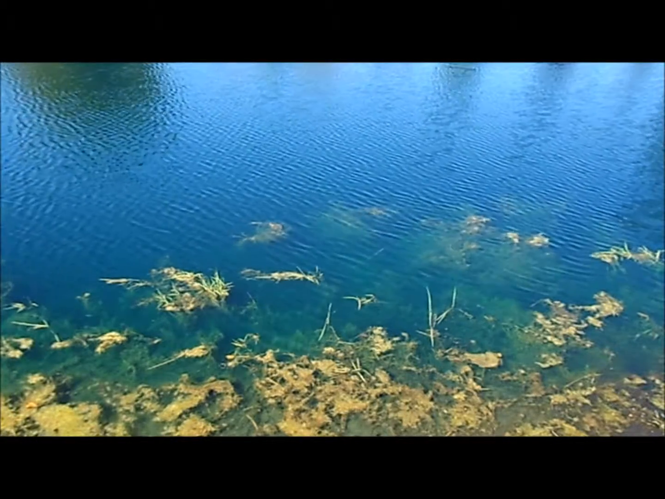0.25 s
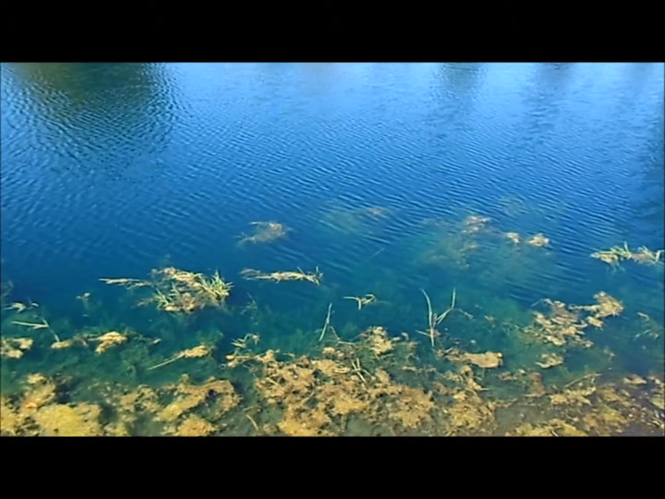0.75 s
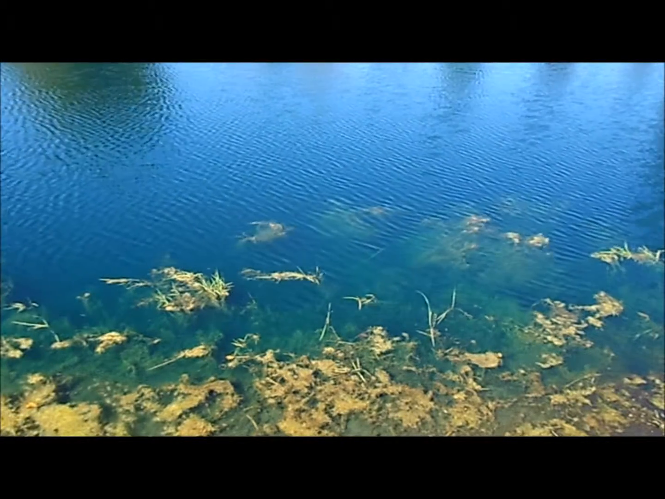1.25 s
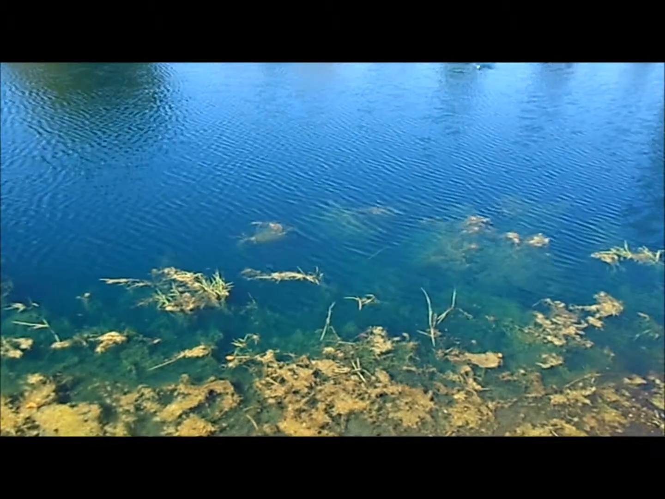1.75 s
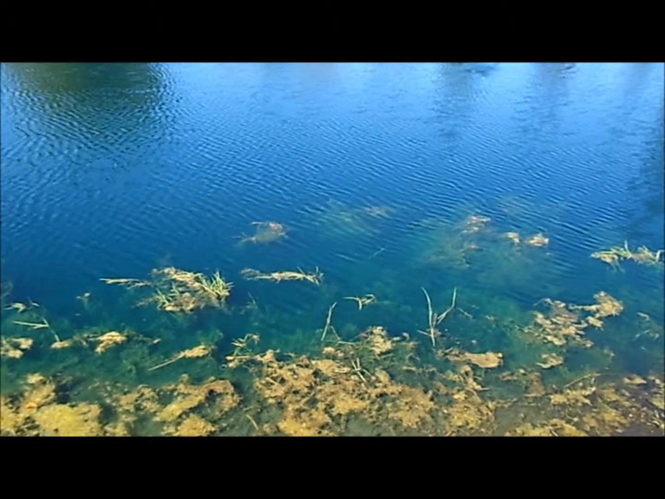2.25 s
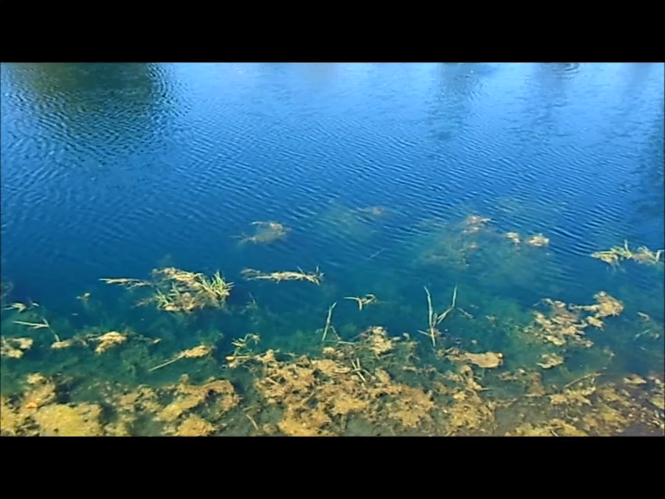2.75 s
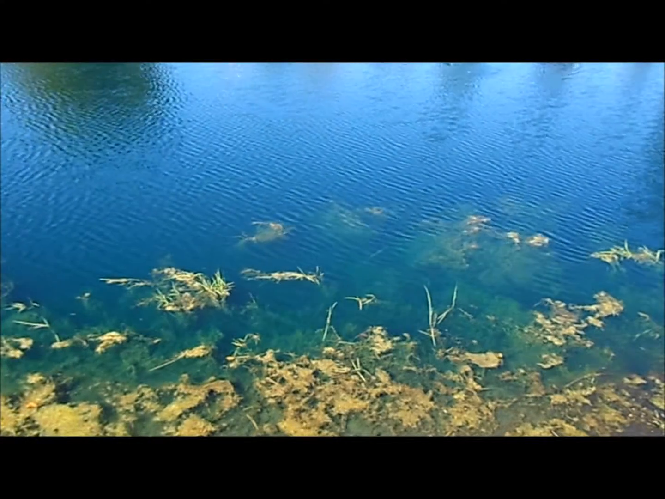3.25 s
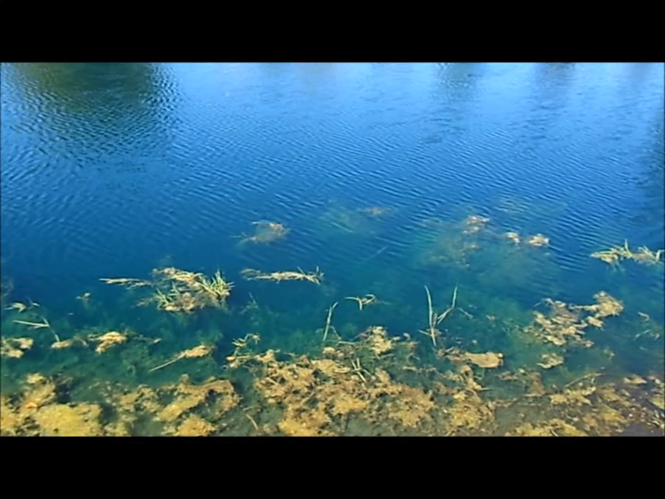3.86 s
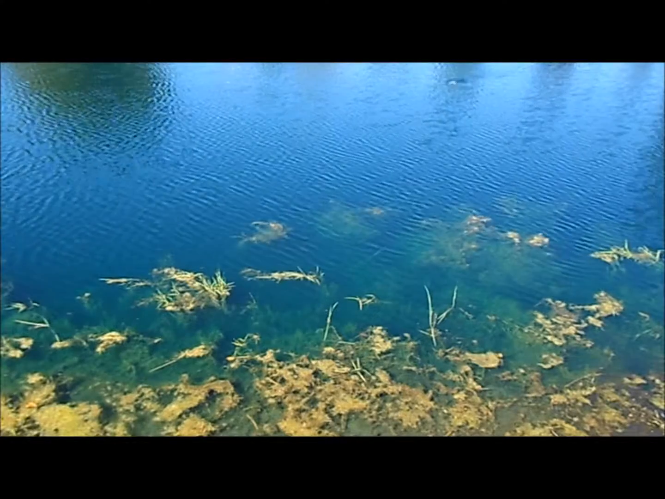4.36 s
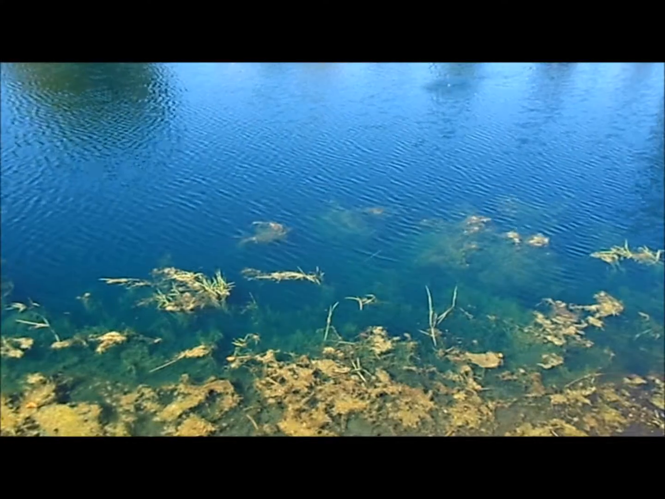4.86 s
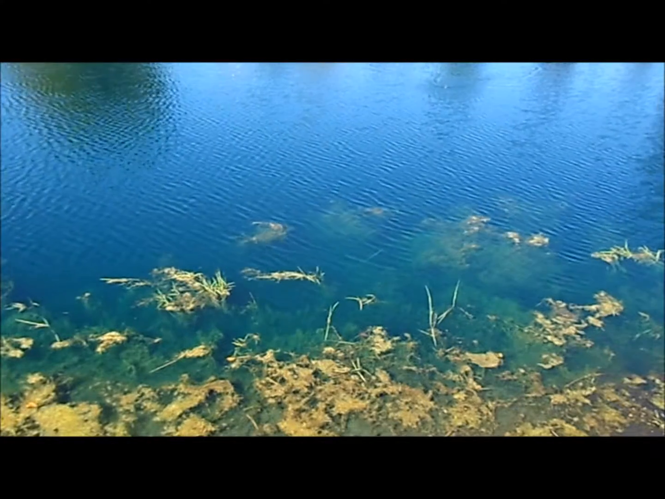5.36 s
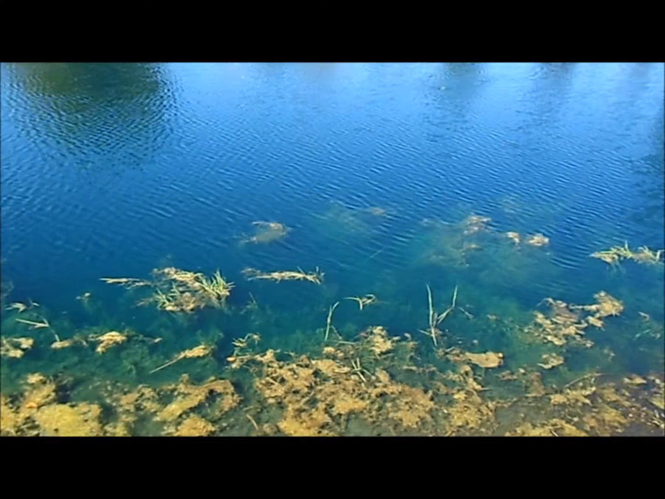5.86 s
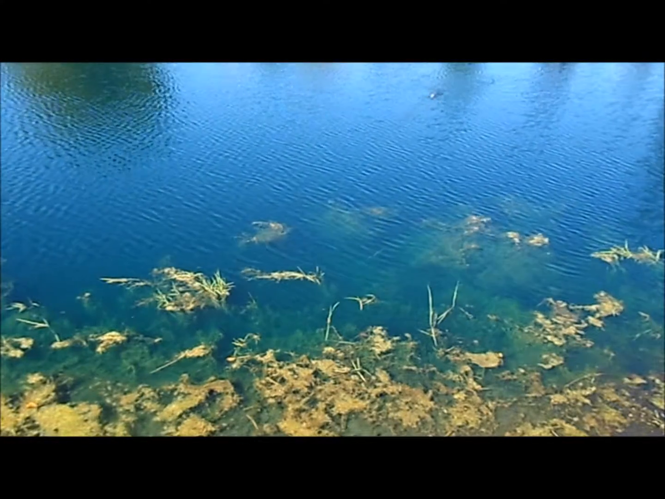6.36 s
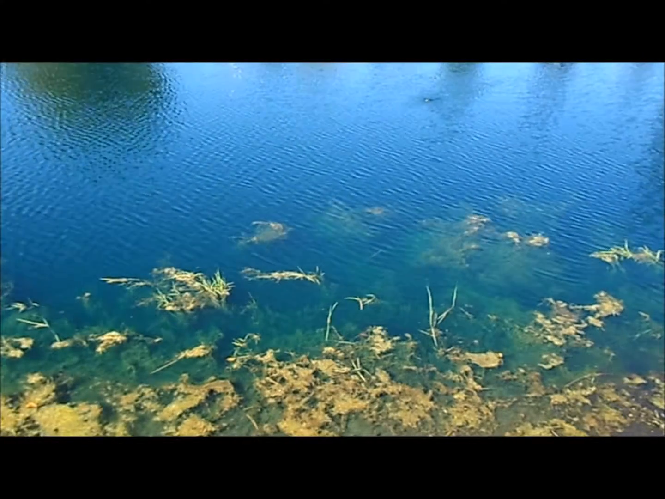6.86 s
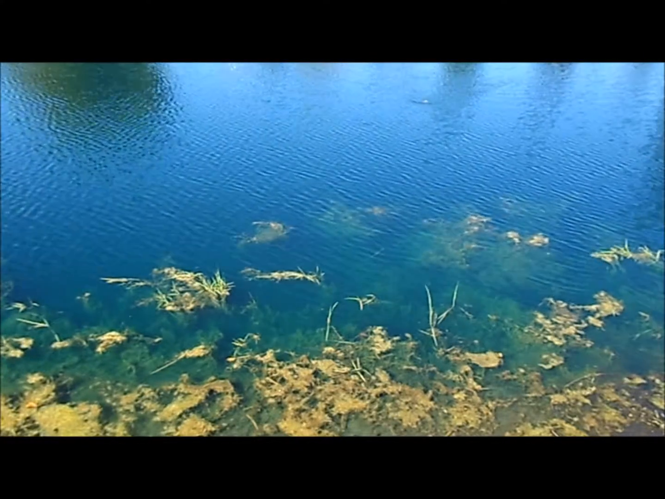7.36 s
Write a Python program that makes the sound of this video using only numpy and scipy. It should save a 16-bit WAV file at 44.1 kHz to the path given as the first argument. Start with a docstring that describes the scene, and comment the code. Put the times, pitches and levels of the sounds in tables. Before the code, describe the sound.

A fishing reel is handled close to a mono microphone at a pond, in open air without echo. From 0 to 0.7 s a hand rubs the body in a coarse, mid-toned scrape while the handle knocks rapidly, short and hollow. The loudest knock lands at 0.83 s, with a small rattle and brief rubs; more knocks come at 1.2-1.4 s. A high metallic tick sounds at 1.72 s. Around 2.0-2.2 s, chirpy line squeaks run into sharp bail clicks and fine ticks. Thin squeaks appear near 2.9-3.05 and 3.5 s, a knock at 3.75 s, and bright clicks at 4.2-4.6 s. Throughout, gusty low wind buffets and rumbles under soft rustle, airy hiss and a very faint thin whine. From 4.5 s the background falls to near quiet, leaving faint ticks around 6.2-6.6 s, a small squeak at 6.9 s, a slight wind swell around 7.1 s, and last tiny ticks at 7.6 s.

```python
"""A fishing reel is wound by a pond: a hand rubs it, its handle knocks, gear and bail tick, its line squeaks.
Friction is crackling noise coloured by the body; each knock excites damped body modes.
The line's stick-slip in the roller gives gliding tones; gear and bail contacts give short damped partials.
Wind on a mono microphone is low shaped noise with gusts, over rustling, an airy hiss and two thin whines.
The loudness of the whole background sinks, with a small swell near the end."""
import sys
import numpy as np
from scipy import signal
from scipy.fft import rfft, irfft
from scipy.io import wavfile
from scipy.ndimage import uniform_filter1d

SR = 44100
rng = np.random.default_rng(int(sys.argv[2]) if len(sys.argv) > 2 else 0)


def output_pcm(signal):
    """Save a mono or channel-first signal as 16-bit PCM at the path in sys.argv[1].

    Samples are clipped to [-1, 1] before scaling.
    """
    pcm = np.clip(np.atleast_2d(signal).T, -1, 1) * 32767
    wavfile.write(sys.argv[1], SR, np.round(pcm).astype(np.int16))


N = 336042
T = np.arange(N) / SR  # time in s

# strokes of a hand along the reel body: [t/s, attack/s, hold/s, release/s (time to fall 30 dB), level/dB]
RUB_STROKES = [(0, 0.14, 0.26, .45, -30), (0.827, .02, 0.055, .12, -36), (1.182, .03, .04, .1, -39),
               (1.31, .03, 0.04, .15, -48)]
# spectrum of the rubbing as the body colours it: [f/Hz, relative density/dB]
RUB_SPECTRUM = [(250, -19), (450, 0.5), (630, 0), (900, 2), (1050, -6), (1280, 1.5), (1600, -6),
                (2300, -14), (3000, -41)]
# overall loudness curve of the background, shared by hiss, rustle and wind: [t/s, level/dB]
BACKGROUND_LEVEL = [(0, -31.5), (.8, -32), (1.2, -31.5), (1.38, -30), (1.57, -33.5), (1.8, -33),
                    (2.25, -32.5), (2.52, -36.5), (2.74, -36.5), (3.05, -34), (4.39, -33.5), (4.55, -33.5),
                    (4.79, -38), (5.47, -45), (6.07, -46.5), (6.54, -46.5), (6.68, -44), (7.05, -41.5),
                    (7.62, -44.5)]
# spectrum of the slow buffeting: [f/Hz, relative density/dB]
BUFFET_SPECTRUM = [(6, -39), (12, -2), (25, -5), (45, -6.5), (70, -24), (120, -72)]
# spectrum of the higher wind rumble: [f/Hz, relative density/dB]
RUMBLE_SPECTRUM = [(30, -38), (50, -1.5), (85, 1.5), (120, -3.5), (145, -10), (178, -7), (210, -16.5),
                   (330, -17), (450, -36)]
# gusts and lulls on the microphone: [t/s, buffeting change/dB, rumble change/dB]
WIND_GUSTS = [(.33, -7, 6.5), (.57, 9, 4), (0.741, 7, -2), (.85, 3.5, 2.5), (1.04, 7, 0), (1.29, 5.5, -3.5),
              (1.62, 5.5, -4), (1.72, -9, -3.5), (1.96, -17, 6), (2.28, -13, 2.5), (2.46, 7.5, 2),
              (2.62, 5, -2), (2.76, 10, 0.5), (2.91, 9.5, 7), (3.14, 4.5, 2.5), (3.58, 3, 3), (3.71, 6, -2),
              (3.99, 6.5, -3), (4.11, 15.5, 0.5), (4.23, 6, 0.5), (4.38, -2, -2), (4.61, -9, 0.5),
              (4.92, 9, 1), (5.22, 3, -3), (6.66, 2, 2), (7.14, 12, 1.5)]
# spectrum of the rustling: [f/Hz, relative density/dB]
RUSTLE_SPECTRUM = [(120, -13), (200, 0.5), (291, -5), (463, -2.5), (561, -4), (1020, -5.5), (1340, -5),
                   (1970, -9), (3000, -14.5), (3900, -44), (6600, -120)]
# broad spectrum of the hiss: [f/Hz, relative density/dB]
HISS_SPECTRUM = [(1500, -28), (2300, -12.5), (2700, -8), (3600, -1.5), (4400, -4), (5600, -7), (6500, -9.5),
                 (8200, -8.5), (9500, -19.5), (10400, -7), (12000, -1)]
# resonant bumps on the hiss: [f/Hz, width/Hz, gain of the bump/dB]
HISS_BUMPS = [(3370, 140, -12.5), (4330, 110, -13), (6780, 240, -3.5), (8100, 150, -16), (9100, 250, 1)]
# thin, almost steady tones: [f/Hz, amplitude relative to the hiss/dB]
WHINE_TONES = [(7837, -17), (7897, -22.5)]
# knocks of handle and body: [t/s, peak level/dB, f driven by the contact/Hz, spread/octaves]
HANDLE_KNOCKS = [(0.165, -17, 1260, .3), (.177, -14, 560, 0.43), (0.2097, -12, 1320, 0.42),
                 (0.2367, -14.5, 1570, 0.26), (0.2683, -13.5, 1330, 0.34), (0.3812, -13, 1370, 0.23),
                 (.426, -18, 869, 0.57), (.516, -20, 514, 0.49), (0.696, -13, 1670, .3),
                 (0.826, -4, 1180, .7), (.8444, -15, 1350, .34), (.862, -19, 1500, .3),
                 (.867, -20, 1300, .12), (.873, -18.5, 1340, .12), (.881, -22, 1290, 0.091),
                 (.9043, -18, 1620, .3), (.948, -20, 1280, 0.089), (1.2046, -18.5, 2290, 0.29),
                 (1.229, -20, 649, .37), (1.3254, -16, 1280, 0.42), (1.3641, -15, 1440, 0.35),
                 (1.379, -15, 1870, .32), (1.3928, -21.5, 1320, .23), (1.788, -24.5, 1750, .08),
                 (1.8046, -19.5, 1400, 0.42), (2.103, -15.5, 1360, 0.052), (2.2187, -15.5, 1440, 0.092),
                 (2.6922, -27, 1480, 0.25), (3.632, -21.5, 1460, 0.28), (3.7453, -14, 1310, 0.32),
                 (4.2503, -25, 1490, .3), (4.2944, -26, 1590, .27), (4.449, -24, 516, 0.28),
                 (6.559, -40, 735, .05)]
# modes of the reel body: [f/Hz, relative level/dB, t60/s]
BODY_MODES = [(493, 0, 0.044), (652, 1, .05), (750, -26, 0.1), (897, 1, 0.061), (1306, -2, 0.058),
              (1390, 2.5, 0.042), (1520, -1, 0.023), (1760, 8, 0.021), (2070, 5, 0.035), (2350, 5, 0.037)]
# squeaks of the line, one row for each slip: [t/s, length/s, first f/Hz, last f/Hz, level before flutter/dB]
LINE_SLIPS = [(.17, .085, 10250, 9900, -47), (1.99, 0.015, 3150, 3400, -28.5),
              (2.0, 0.017, 3540, 3600, -27), (2.013, .012, 3400, 3320, -27),
              (2.022, 0.017, 3850, 3890, -29), (2.041, 0.0067, 5040, 4800, -26),
              (2.048, .007, 4650, 4600, -23), (2.061, 0.013, 4570, 4400, -26),
              (2.077, .012, 4450, 4400, -21), (2.088, .017, 4420, 4430, -20),
              (2.868, .016, 7520, 7400, -36), (2.89, .014, 7700, 7850, -37), (2.909, .014, 7620, 7620, -36),
              (3.021, .012, 3800, 3800, -31), (3.04, .018, 3300, 3330, -35), (3.054, .018, 3740, 3380, -29),
              (3.07, 0.014, 3100, 3150, -32.5), (3.471, .011, 3180, 3060, -30),
              (3.482, 0.01, 3140, 3100, -31), (3.493, .012, 2930, 2770, -31),
              (3.498, 0.026, 2370, 2040, -34), (3.519, 0.022, 2250, 2100, -32),
              (3.536, .012, 2250, 2500, -39), (4.197, .006, 2620, 2600, -33),
              (4.205, 0.013, 2740, 2680, -34), (6.878, .023, 4530, 4580, -32.5),
              (6.9, .018, 4400, 4670, -35), (6.915, 0.016, 4620, 4650, -37),
              (7.588, 0.034, 3230, 3000, -45)]
# ticks of the gear: [t/s, peak level/dB, centre f/Hz]
GEAR_TICKS = [(1.723, -11, 9400), (1.8574, -20, 9600), (1.8801, -23, 5970), (2.0368, -18, 8100),
              (2.0595, -20, 5000), (2.1114, -26, 9140), (2.1335, -22, 9800), (2.142, -28, 6900),
              (2.15, -16, 4500), (2.1674, -31, 8350), (2.2523, -23, 3640), (2.692, -30, 3130),
              (3.0744, -26, 6400), (4.1884, -16, 6560), (4.1934, -21, 5910), (4.3854, -22.5, 6860),
              (4.5027, -22, 8700), (4.5805, -21, 4900), (4.5894, -19.5, 8150), (4.6099, -25, 4960),
              (4.636, -27, 6500), (6.2023, -34, 8310), (6.2915, -34, 3760), (6.56, -31.5, 3100),
              (7.5827, -30, 6060), (7.5994, -33, 5500)]
# sharp clicks of the bail: [t/s, level/dB, tilt/(dB per octave)]
BAIL_SNAPS = [(2.1016, -11.5, -1.5), (2.156, -17, 1), (2.199, -18.5, 5), (2.2184, -10, -2.5),
              (4.18, -25.5, 16.5), (4.555, -23, 3)]
# parts of the bail that a snap rings: [f/Hz, relative level/dB, t60/s]
BAIL_MODES = [(2960, -6.5, 0.01), (4670, 0.5, 0.0099), (6620, -4, 0.018), (8330, -14.5, 0.0058),
              (10100, -2.5, 0.0054)]

RUSTLE_DB, RUMBLE_DB, BUFFET_DB = -4, 0, -0.5  # relative to the background level
RUSTLE_START_DB, RUSTLE_SETTLE_S = 5.5, 0.9  # initial excess of the rustle and its time constant
CALM_S, CALM_OVER_S, CALM_DB = 4.48, 0.5, -8  # start, duration and size of the drop as the wind eases
GUST_S = 0.051  # time from a gust's centre to 1/e of its dB change
SLIP_SWELL = 0.67  # exponent of the half-sine envelope of a slip
TICK_T60_S, TICK_REF_HZ, TICK_DAMPING = 0.012, 4600, 1  # t60 at the reference; it falls as f ** -damping
TOP_HZ = 11450  # stopband edge of the recorder


def undb(db):
    """A level in dB is 20 times the decimal logarithm of an amplitude ratio."""
    return 10 ** (np.asarray(db) / 20)


def unit(x):
    """Division by the root mean square gives a signal of unit rms."""
    return x / np.sqrt(np.mean(x ** 2))


def colour(x, points, peaks=()):
    """Linear filtering multiplies a spectrum by a gain curve and resonant bumps; the result has unit rms."""
    hz = np.maximum(np.arange(N // 2 + 1) * SR / N, 1)
    point_hz, point_db = np.transpose(points)
    gain = undb(np.interp(np.log(hz), np.log(point_hz), point_db, left=-90, right=-90))
    bumps = 1 + sum(undb(db) / (1 + (2 * (hz - centre) / width) ** 2) for centre, width, db in peaks)
    return unit(irfft(rfft(x) * gain * bumps, N))


def walk(rate, count=N):
    """Slow random modulation: normal values held for 1 / rate s, smoothed by two moving averages."""
    hold = int(SR / rate)
    held = np.repeat(rng.standard_normal(count // hold + 1), hold)
    smooth = uniform_filter1d(uniform_filter1d(held, hold), hold)
    return 1.3 * smooth[:count]  # restores much of the spread lost in averaging


def crackle(per_s, scatter_db):
    """Granular noise: sparse random impulses of uneven size briefly raise the amplitude of white noise."""
    grains = (rng.random(N) < per_s / SR) * undb(scatter_db * rng.exponential(size=N))
    decay = np.exp(-T[:200] / 0.00084)  # time constant in s
    return rng.standard_normal(N) * (1 + np.convolve(grains, decay)[:N])


def add(out, s, x):
    """Superposition: a sound starting at s seconds sums with those already present."""
    i = int(s * SR)
    out[i:i + len(x)] += x[:N - i]


def follow(rows):
    """Linear interpolation gives each column of a curve table at every sample."""
    s, *columns = np.transpose(rows)
    return [np.interp(T, s, column) for column in columns]


def rub():
    """Sliding friction: dense slips of skin and cloth, coloured by the body, rise, hold and decay per stroke."""
    strokes = np.zeros(N)
    for s, attack, hold, release, db in RUB_STROKES:
        rise = np.clip((T - s) / attack, 0, 1)
        since_hold = np.maximum(T - s - attack - hold, 0)
        strokes += undb(db) * rise * 1000 ** (-since_hold / (2 * release))
    return colour(crackle(250, 3.9), RUB_SPECTRUM) * strokes


def wind():
    """Wind noise at a microphone: slow buffeting and a higher rumble, which gusts lift or lull."""
    background_db, = follow(BACKGROUND_LEVEL)
    s, *lift_db = np.transpose(WIND_GUSTS)
    gusts = np.exp(-((T[None] - s[:, None]) / GUST_S) ** 2)
    buffet_db, rumble_db = background_db + lift_db @ gusts
    buffet_db = buffet_db + BUFFET_DB + CALM_DB * np.clip((T - CALM_S) / CALM_OVER_S, 0, 1)
    rumble_db = rumble_db + RUMBLE_DB + 0.92 * walk(8)
    buffet = colour(rng.standard_normal(N), BUFFET_SPECTRUM) * undb(buffet_db)
    rumble = colour(rng.standard_normal(N), RUMBLE_SPECTRUM) * undb(rumble_db)
    return buffet + rumble


def air():
    """Broadband noise with slow amplitude modulation: rustle and hiss, with whines, share the background level."""
    hiss_db, = follow(BACKGROUND_LEVEL)
    rustle_db = hiss_db + RUSTLE_DB + RUSTLE_START_DB * np.exp(-T / RUSTLE_SETTLE_S)
    rustle = colour(crackle(40, 2.0), RUSTLE_SPECTRUM) * undb(rustle_db + 0.52 * walk(12))
    whine = np.zeros(N)
    for hz, db in WHINE_TONES:
        wavering_hz = hz + 1.52 * walk(2)
        whine += undb(db) * np.sin(2 * np.pi * np.cumsum(wavering_hz) / SR)
    hiss = colour(crackle(30, 0.83), HISS_SPECTRUM, HISS_BUMPS) * undb(0.73 * walk(14))
    return rustle + (hiss + whine) * undb(hiss_db)


def knocks():
    """Modal excitation: each blow rings most strongly the damped body modes near its contact frequency."""
    out, t = np.zeros(N), T[:4000]
    hz, db, t60 = np.transpose(BODY_MODES)[:, :, None]
    detunes = rng.standard_normal((len(HANDLE_KNOCKS), len(BODY_MODES), 1))
    for (s, peak_db, drive_hz, spread), detune in zip(HANDLE_KNOCKS, detunes):
        octaves_off = np.log2(hz / drive_hz)
        gains = undb(db) * np.exp(-0.5 * (octaves_off / max(spread, 0.05)) ** 2)
        modes = np.sin(2 * np.pi * hz * (1 + 0.016 * detune) * t) * 1000 ** (-t / t60)
        ring = (gains * modes).sum(axis=0)
        add(out, s, undb(peak_db) * ring / np.abs(ring).max())
    return out


def squeaks():
    """Stick-slip oscillation of the line in the roller: wavering, fluttering tones with a second harmonic."""
    out = np.zeros(N)
    for s, length, first_hz, last_hz, level_db in LINE_SLIPS:
        gone = T[:int(length * SR)] / length  # elapsed fraction of the slip
        hz = first_hz + (last_hz - first_hz) * gone
        rough = min((3200 / hz.mean()) ** 2, 1.4)  # lower tones are rougher and richer in the octave
        waver = 1 + 0.02 * rough ** 2 * walk(500, count=len(hz))
        phase = 2 * np.pi * np.cumsum(hz * waver) / SR
        flutter = 1 + 0.45 * rough * walk(500, count=len(hz))
        grip = undb(level_db) * np.sin(np.pi * gone) ** SLIP_SWELL * flutter
        octave = undb(-11.5) * rough ** 2 * np.sin(2 * phase)
        add(out, s, grip * (np.sin(phase) + octave) * np.sqrt(2))  # level refers to the fundamental's rms
    return out


def ticks():
    """Damped free vibration: tiny metal contacts sound three close partials; a snap rings all bail parts."""
    out, t = np.zeros(N), T[:1800]
    contacts = [(s, db, hz, TICK_T60_S * (TICK_REF_HZ / hz) ** TICK_DAMPING) for s, db, hz in GEAR_TICKS]
    for s, snap_db, tilt_db in BAIL_SNAPS:
        for hz, db, t60 in BAIL_MODES:
            peak_db = snap_db + db + tilt_db * np.log2(hz / TICK_REF_HZ)
            contacts.append((s, peak_db, hz, t60))
    detunes = rng.standard_normal((len(contacts), 3, 1))
    for (s, peak_db, hz, t60), detune in zip(contacts, detunes):
        partials = np.sin(2 * np.pi * hz * (1 + 0.075 * detune) * t)
        ring = partials.sum(axis=0) * 1000 ** (-t / t60)
        ring *= 1 - np.exp(-t / 0.00013)  # gradual onset of the contact, time constant in s
        add(out, s, undb(peak_db) * ring / np.abs(ring).max())
    return out


def scene():
    """Superposition of all sources into one pressure signal, the same in both channels."""
    mono = rub() + wind() + air() + knocks() + squeaks() + ticks()
    return np.array([mono, mono])


def record(dry):
    """Low-pass filtering: the recorder cuts the top steeply, by 75 dB or more above its stopband edge."""
    return signal.sosfilt(signal.cheby2(14, 75, TOP_HZ, fs=SR, output="sos"), dry)


dry = scene()
out = record(dry)
output_pcm(out)
```